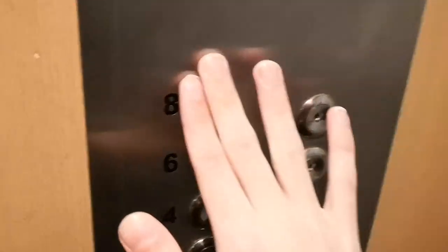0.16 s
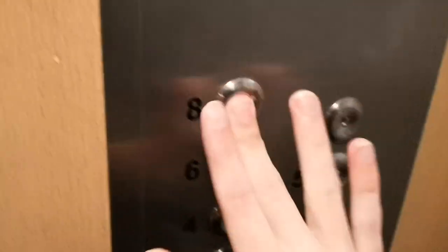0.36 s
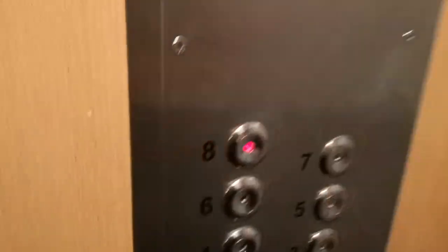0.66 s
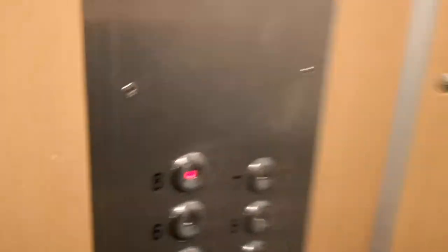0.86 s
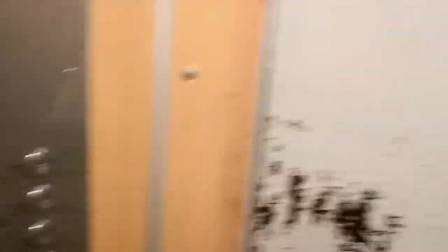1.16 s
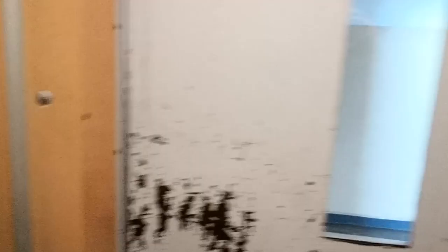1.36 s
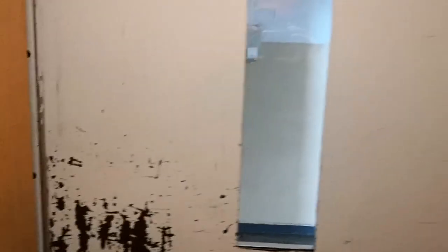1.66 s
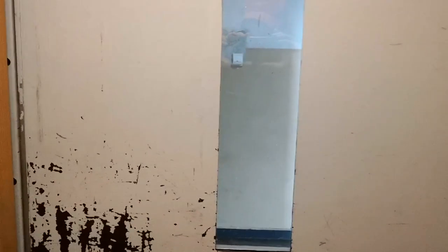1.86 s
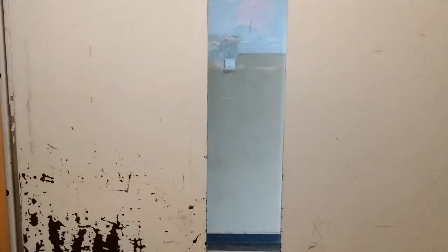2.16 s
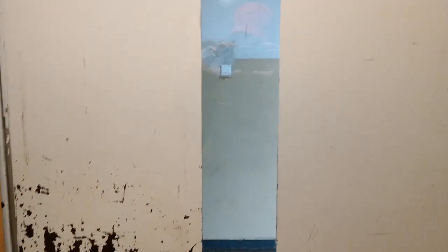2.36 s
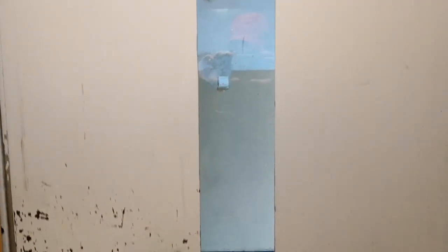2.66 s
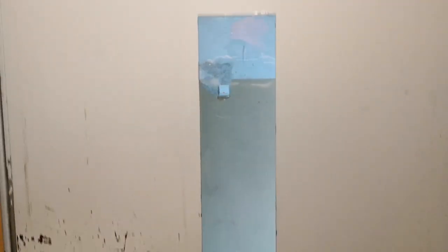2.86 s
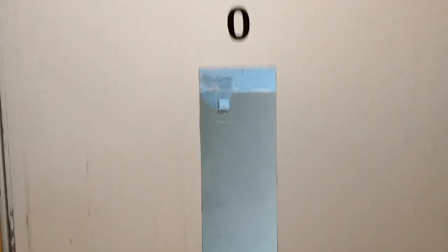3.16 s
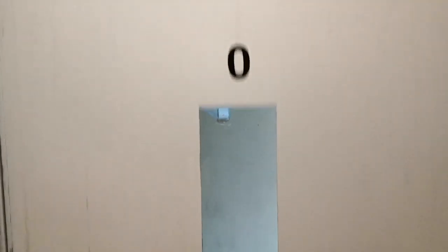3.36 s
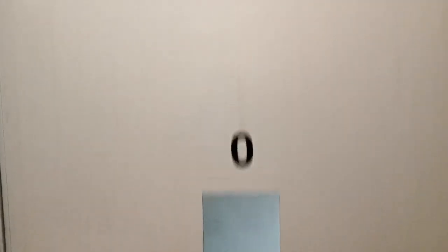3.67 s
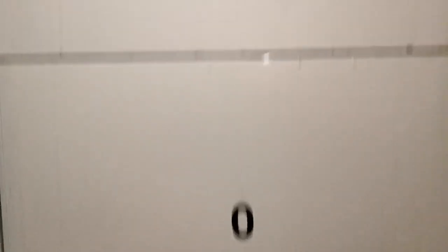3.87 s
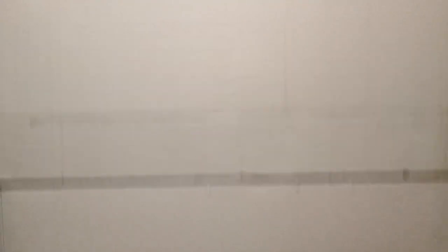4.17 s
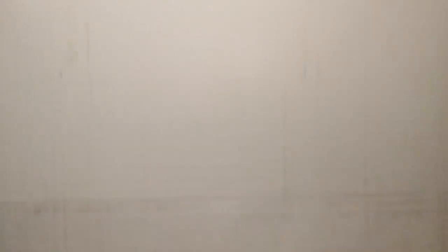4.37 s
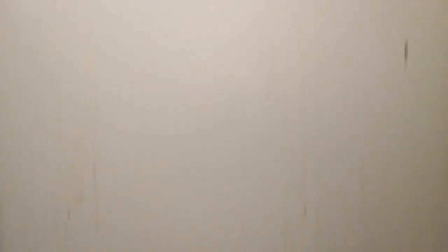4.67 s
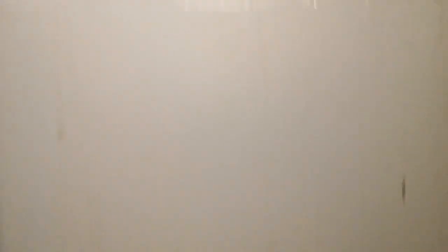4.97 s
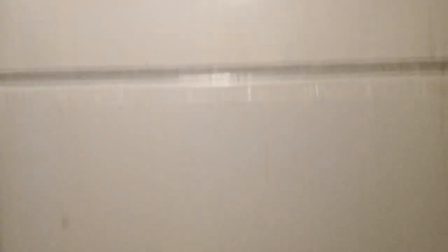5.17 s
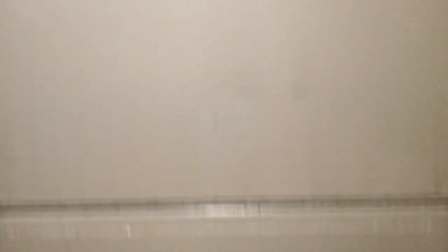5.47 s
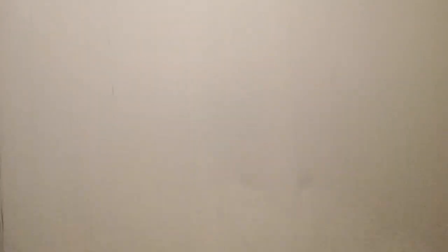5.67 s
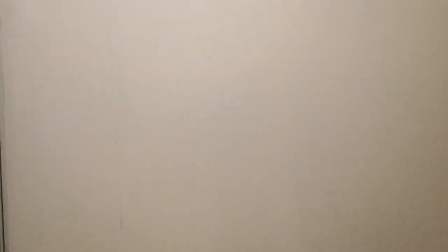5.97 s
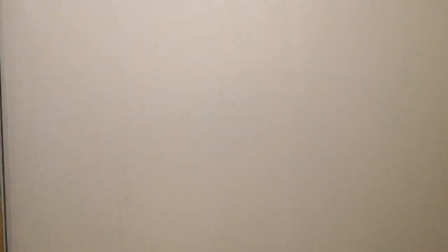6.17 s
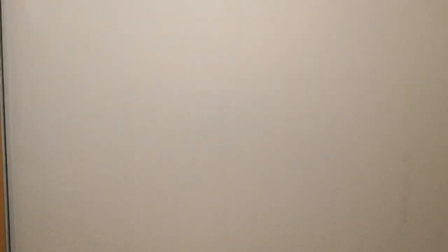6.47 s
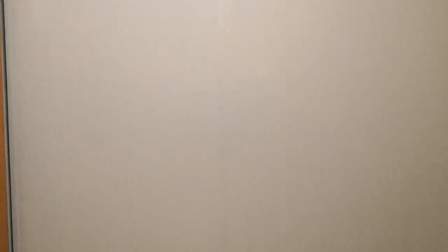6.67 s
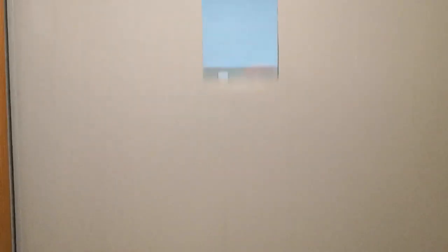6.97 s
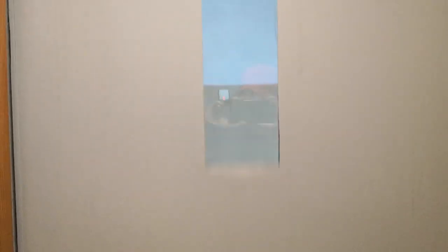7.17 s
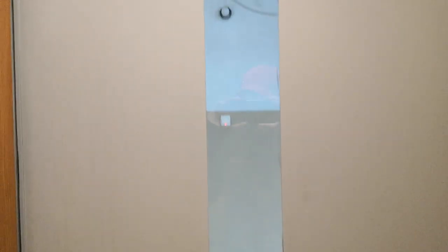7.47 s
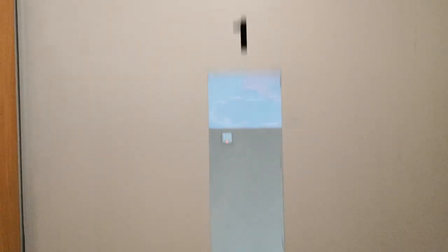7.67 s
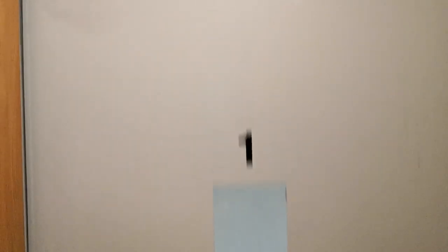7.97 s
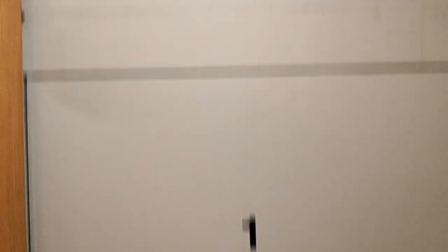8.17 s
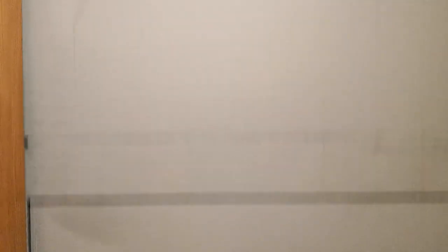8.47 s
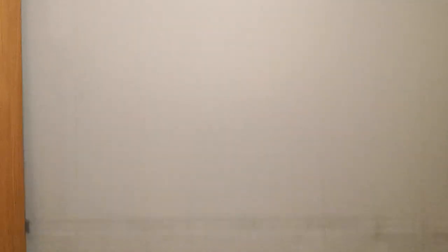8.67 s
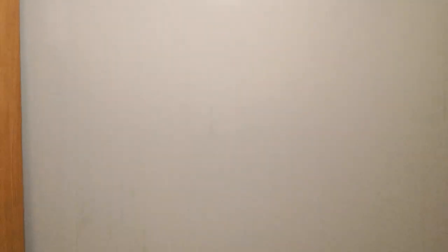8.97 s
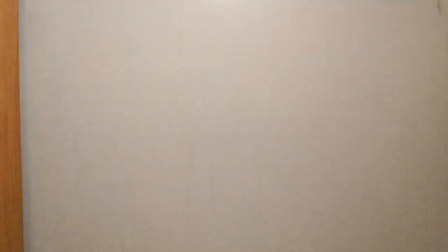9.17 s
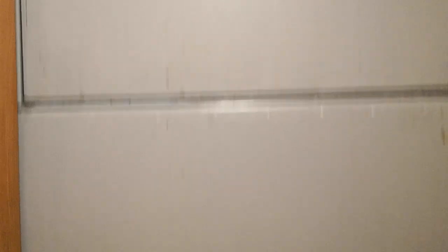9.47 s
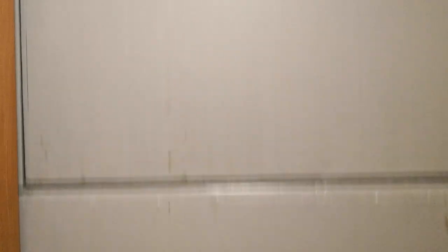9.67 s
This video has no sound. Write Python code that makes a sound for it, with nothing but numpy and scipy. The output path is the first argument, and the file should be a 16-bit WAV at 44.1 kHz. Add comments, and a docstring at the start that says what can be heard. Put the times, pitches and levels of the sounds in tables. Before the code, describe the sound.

Inside a small hard-walled lift car, heard close in stereo. At 0 s a button press gives a clack and a deep thud with low rumble; more clacks follow at 0.4-0.6 s. At about 1 s a hard, loud clunk lands with a short harsh scrape and a floor jolt as the car starts. From 1.5 to 4 s it is quiet: soft low rumble, hum near 90 Hz, faint hiss, tiny ticks clustered at 3.1-3.8 s. From 4 to 4.9 s the guides rub in gritty gusts with dry knocks. Ticks, then a doubled woody knock at 5.5 s, lurches, and a loose panel rattle with scrapes at 5.9-6.1 s. Then calm humming, small ticks and a barely audible thin whine until 8.7 s. From 8.75 s, bright hard raps hit a panel: three quick, then roughly every 0.2 s to the end at 9.8 s, briefly echoing, the last two close together.

```python
"""A button press and a thud open the scene: a small doorless lift car starts and climbs past the landings.
Shaped noise gives its rumble, hum, floor thuds, air booms, hissing and scraping guides, and faint whines.
Larger parts knock and small parts tick as short noise bursts; a panel rattles and is rapped as decaying modes.
Two spaced microphones hear alike in the bass and unalike in the treble of the hard-walled car."""
import sys
import numpy as np
from scipy import signal
from scipy.fft import rfft, irfft, next_fast_len
from scipy.io import wavfile
from scipy.ndimage import uniform_filter1d

SR = 44100
rng = np.random.default_rng(int(sys.argv[2]) if len(sys.argv) > 2 else 0)


def unload_wav(signal):
    """Save mono or channel-first audio to the path in sys.argv[1] as 16-bit WAV at rate SR, clipped to [-1, 1]."""
    wavfile.write(
        sys.argv[1],
        SR,
        np.round(np.clip(np.atleast_2d(signal).T, -1, 1) * 32767).astype(np.int16),
    )


N = 432621  # length in samples
STRIKE_S = np.arange(SR // 2) / SR  # time axis of one knock, tick or rap


def gain_of(db):
    """Decibel law: 20 dB is a factor of ten in amplitude."""
    return 10 ** (np.asarray(db) / 20)


def evened(x):
    """Normalization to unit root-mean-square amplitude."""
    return x / np.sqrt(np.mean(x ** 2) + 1e-20)


def read(points, hz):
    """Interpolation of a spectrum along a logarithmic frequency axis."""
    point_hz, value = np.transpose(points)
    return np.interp(np.log(hz + 1), np.log(point_hz + 1), value)


def curves(rows):
    """Linear interpolation in time of every column after the first."""
    time_s, *columns = np.transpose(rows)
    return [np.interp(np.arange(N) / SR, time_s, column) for column in columns]


def add(mix, start_s, sound):
    """Superposition: a sound is summed into the mix, cut where the mix ends."""
    part = mix[:, round(start_s * SR):][:, :sound.shape[1]]
    part += sound[:, :part.shape[1]]


def peak(hz, centre_hz, width_hz):
    """Resonance: the gain is 1 at the centre and 3 dB down at the edges of the width."""
    return 1 / np.sqrt(1 + (2 * (hz - centre_hz) / width_hz) ** 2)


def modes(hz, table):
    """Modal superposition: the powers of a set of steep resonances add."""
    power = sum((gain_of(db) * peak(hz, mode_hz, width_hz) ** 2) ** 2 for mode_hz, width_hz, db in table)
    return np.sqrt(power)


def slope(hz, edge_hz, order=3):
    """High-pass transition: the gain rises through one half at the edge."""
    return hz ** order / (hz ** order + edge_hz ** order)


# Likeness of the two microphones: frequency_hz, correlation (1 alike, 0 unrelated, -1 opposed)
LIKENESS = [(30, 1), (60, 1), (170, 0.96), (345, 0.58), (520, -0.25), (690, -0.24), (1200, 0.11),
            (1700, -0.1), (2400, -0.11), (3400, 0.15), (4300, -0.15), (8000, .1)]


def likeness(hz):
    """Spatial coherence: the correlation of spaced microphones depends on frequency."""
    return np.clip(read(LIKENESS, hz), -1, 1)


def diffuse(size, colour):
    """Diffuse field: noise from all around, partly shared by two microphones; colour(hz) is its gain."""
    hz = np.fft.rfftfreq(size, 1 / SR)
    left, other = rfft(rng.standard_normal((2, size)))
    same = likeness(hz)
    right = same * left + np.sqrt(1 - same ** 2) * other
    return evened(irfft(np.array([left, right]) * colour(hz), size))


def steadied(x, share):
    """Envelope compression: takes a share of the random throb out of narrow noise."""
    power = uniform_filter1d((x ** 2).mean(0), 1800)  # window in samples
    throb = np.sqrt(abs(power) + .02)
    return evened(x / throb ** share)


def wander(seconds):
    """Low-pass random process: white noise averaged twice over the given time."""
    window = round(seconds * SR)
    once = uniform_filter1d(rng.standard_normal(N), window)
    return evened(uniform_filter1d(once, window))


def humps(events, rise_db_per_s, fall_db_per_s):
    """Exponential growth and decay: the power over time of events around their peaks."""
    lead = SR // 4  # room for growth before the scene begins
    t = np.arange(-lead, SR // 2)[None] / SR
    power = np.zeros((1, N + lead))
    shape = gain_of(np.where(t < 0, rise_db_per_s * t, -fall_db_per_s * t)) ** 2
    for peak_s, db in events:
        add(power, peak_s, gain_of(db) ** 2 * shape)
    return power[0, lead:]


def swelling(steady_db, burst_power, colour):
    """Power addition: coloured noise follows a running level plus bursts."""
    noise = diffuse(next_fast_len(N), colour)[:, :N]
    return np.sqrt(gain_of(steady_db) ** 2 + burst_power) * steadied(noise, 0.44)


# Spectrum of the sway: frequency_hz, relative_db_per_hz
SWAY_SPECTRUM = [(15, -4.5), (28, 5.5), (48, -1.5), (70, -10.5), (110, -34.5), (300, -70), (3000, -200)]
# Running level of the car: time_s, rumble_db, hum_db
RUNNING_LEVELS = [(0.0, -46.5, -44.5), (1.6, -50, -57), (2.0, -63.5, -67.5), (2.2, -48.5, -50),
                  (2.36, -55, -60), (2.55, -59.5, -65), (2.7, -62.5, -56.5), (3.2, -60, -55.5),
                  (3.8, -52, -56.5), (4.3, -51, -56), (5.3, -48.5, -50), (6.5, -45, -53),
                  (6.95, -55, -51.5), (7.5, -50, -49), (8.4, -48.5, -51), (9.81, -54.5, -54)]
# Lurches of the car on its ropes: peak_s, level_db
LURCHES = [(0.0, -19), (.09, -24), (.19, -25), (.29, -29), (.38, -32.5), (.6, -39), (.93, -35.5),
           (1.03, -26), (1.15, -23.5), (1.23, -31.5), (1.48, -36), (2.16, -41.5), (2.26, -39.5),
           (4.37, -31.5), (4.5, -36.5), (4.64, -32.5), (4.86, -37), (5.16, -37), (5.6, -33), (5.79, -31),
           (5.96, -35), (6.25, -41.5), (8.99, -42), (9.26, -43), (9.5, -41), (9.7, -43)]


def sway():
    """Low-frequency vibration: the car sways and lurches on its ropes as a rumble."""
    rumble_db = curves(RUNNING_LEVELS)[0]
    lurches = humps(LURCHES, rise_db_per_s=170, fall_db_per_s=130)
    return swelling(rumble_db, lurches, lambda hz: gain_of(read(SWAY_SPECTRUM, hz)))


# Swells of the hum: peak_s, level_db
HUM_SWELLS = [(.16, -30), (.6, -41), (.72, -40), (.93, -31.5), (1.03, -33), (1.15, -34.5), (1.55, -41),
              (2.75, -50.5), (3.05, -50), (3.32, -38), (3.93, -43.5), (4.26, -38), (4.48, -43.5),
              (4.7, -44), (5.04, -41.5), (5.5, -43), (5.62, -40), (5.85, -35.5), (6.14, -40.5), (6.31, -46),
              (6.47, -40.5), (7.45, -46), (7.78, -45), (8.61, -38.5), (8.77, -41), (9.07, -46), (9.4, -42),
              (9.7, -43)]


def hum():
    """Single-mode resonance: noise in one narrow band is heard as a swelling hum."""
    hum_db = curves(RUNNING_LEVELS)[1]
    swells = humps(HUM_SWELLS, rise_db_per_s=130, fall_db_per_s=160)
    return swelling(hum_db, swells, lambda hz: peak(hz, 92, 15) ** 2)


# Modes of the floor: frequency_hz, half_gain_width_hz, relative_db
FLOOR_MODES = [(145.3, 22, 2.5), (181.6, 41, -7), (221.8, 9.8, -7)]
# Thuds of the floor and the booms they raise in the air: peak_s, thud_db, boom_db
THUDS = [(0.0, -19.5, -44), (.07, -24, -31.5), (0.151, -28.5, -35), (.25, -40.5, -44.5), (.35, -34.5, -51),
         (.6, -35.5, -46), (.66, -49, -45.5), (1.011, -28, -26), (1.08, -30.5, -33), (1.15, -33, -37),
         (1.23, -47, -47), (1.5, -48, -59), (1.55, -53.5, -63), (5.051, -53.5, -68), (5.46, -49.5, -64),
         (5.55, -57, -40.5), (5.6, -47, -46), (5.79, -48, -36), (5.98, -60, -41), (5.85, -58, -42.5),
         (6.3, -58, -52)]


def floor():
    """Structural modes: the floor thuds, and between thuds its level follows the rubbing."""
    rush_db = curves(RUBBING)[0]
    floor_db = -62.5 + 0.51 * (rush_db + 60)
    thuds = humps([(peak_s, db) for peak_s, db, _ in THUDS], rise_db_per_s=170, fall_db_per_s=130)
    return swelling(floor_db, thuds, lambda hz: modes(hz, FLOOR_MODES))


# Modes of the air in the car: frequency_hz, half_gain_width_hz, relative_db
AIR_MODES = [(254.4, 35, 3), (296, 29, -3), (370.2, 66, -6), (484, 26, -8)]
RAP_BOOM_DB, RAP_BOOM_DELAY_S = -27, .056  # air boom after a rap, relative to the rap


def air():
    """Cavity modes: the enclosed air booms with thuds and after raps, and follows the rubbing."""
    rush_db = curves(RUBBING)[0]
    air_db = -63.5 + 0.82 * (rush_db + 60)
    booms = [(peak_s, boom_db) for peak_s, _, boom_db in THUDS]
    booms += [(time_s + RAP_BOOM_DELAY_S, db + RAP_BOOM_DB) for time_s, db, _ in RAPS]
    boom_power = humps(booms, rise_db_per_s=330, fall_db_per_s=250)
    return swelling(air_db, boom_power, lambda hz: modes(hz, AIR_MODES))


# Spectrum of rubbing: frequency_hz, relative_db_per_hz
RUBBING_SPECTRUM = [(200, -29.5), (400, -9.5), (620, -6.5), (1070, -7.5), (1870, -2), (2570, -8),
                    (3200, -13.5), (4120, -18.5), (5100, -20.5), (6000, -28.5), (7450, -22), (8200, -37.5),
                    (8600, -46), (11500, -40), (15500, -51.5)]


def rubbing(hz, above):
    """Band division: the rush lies under the 3500 Hz split, the fizz above it."""
    share = slope(hz, 3500, order=6)
    return gain_of(read(RUBBING_SPECTRUM, hz)) * (share if above else 1 - share)


# Rubbing along the guides: time_s, rush_db, fizz_db
RUBBING = [(0.0, -41.5, -62), (0.3, -59, -64.5), (0.6, -60, -56.5), (0.72, -70, -64), (0.77, -55, -58.5),
           (0.9, -53.5, -65.5), (1.04, -31, -37), (1.1, -40, -56), (1.23, -50, -68), (1.42, -63, -68),
           (1.75, -74.5, -75.5), (2.59, -78, -83), (3.11, -77, -79), (3.9, -71, -82), (4.04, -51, -72),
           (4.1, -42, -65), (4.18, -43.5, -53.5), (4.23, -38, -57.5), (4.4, -38.5, -51), (4.58, -43, -69),
           (4.7, -38, -42.5), (4.83, -43.5, -60.5), (4.95, -59.5, -77.5), (5.3, -64, -76),
           (5.54, -66.5, -79), (5.68, -49.5, -79), (5.87, -52, -76), (5.93, -35, -62), (6.02, -50, -72),
           (6.08, -38.5, -79), (6.28, -61, -77), (6.78, -65, -79), (8.17, -64.5, -73.5), (8.75, -62.5, -77),
           (8.95, -46.5, -58), (9.2, -56.5, -74.5), (9.81, -49.5, -67)]
# Spectrum of the steady hiss: frequency_hz, relative_db_per_hz
HISS_SPECTRUM = [(100, -26), (200, -20), (260, -15), (500, -22.5), (1200, -24.5), (1860, -18.5),
                 (3000, -23.5), (6200, -38.5), (7340, -34.5), (8200, -35), (15500, -30)]
HISS_DB = -71.5


def guides(grain_db=2.0, stroke_db=1.2):
    """Friction noise: rubbing turns grainy as the shoes catch and slip, over a steady hiss."""
    size = next_fast_len(N)
    rush_db, fizz_db = curves(RUBBING)
    force = np.clip((rush_db + 56) / 25, .3, 1)  # hard rubbing is rougher
    roughness_db = force * (grain_db * wander(0.0035) + stroke_db * wander(0.019))
    rush = gain_of(rush_db) * diffuse(size, lambda hz: rubbing(hz, False))[:, :N]
    fizz = gain_of(fizz_db) * diffuse(size, lambda hz: rubbing(hz, True))[:, :N]
    hiss = gain_of(HISS_DB) * diffuse(size, lambda hz: gain_of(read(HISS_SPECTRUM, hz)))[:, :N]
    return (rush + fizz) * gain_of(roughness_db) + hiss


def fade(t, rise_s, t60_s):
    """Reverberant decay: a smooth onset, then 60 dB of fall in each t60."""
    return (1 - np.exp(-(t / rise_s) ** 2)) * gain_of(-60 * t / t60_s)


def sides(pan_db):
    """Level difference: half is added on the left and half taken off on the right."""
    return gain_of([[pan_db / 2], [-pan_db / 2]])


def snap(db, fizz_db, boom_db, ring_hz, ring_db, rise_s, t60_s, pan_db):
    """Impact excitation: a thin clack with a short ring, fizz on top and a slower boom, dying in the car."""
    t = STRIKE_S
    # a clack with little fizz stops low; its top rises with the fizz
    top_hz = 2500 + 90 * max(fizz_db - db + 31, 0)
    clack = diffuse(len(t), lambda hz: rubbing(hz, False) * slope(hz, 720) * (1 - slope(hz, top_hz, order=10)))
    ring = diffuse(len(t), lambda hz: peak(hz, ring_hz, 0.2 * ring_hz) ** 2)
    ring = ring * (0.4 + 0.97 * gain_of(-60 * t / 0.11))  # quicker first drop
    fizz = diffuse(len(t), lambda hz: rubbing(hz, True))
    boom = diffuse(len(t), lambda hz: modes(hz, AIR_MODES) + 0.33 * peak(hz, 700, 900) ** 2)
    share = gain_of(ring_db - 1.5)
    body = (clack + share * ring) / np.sqrt(1 + share ** 2)
    bright = gain_of(db) * body + gain_of(fizz_db) * fizz
    slow_boom = gain_of(boom_db) * boom * fade(t, 0.018, 1.1 * t60_s)
    return sides(pan_db) * bright * fade(t, rise_s, t60_s) + slow_boom


# Knocks and clacks of larger parts: time_s, level_db, fizz_db, boom_db, ring_hz,
# ring_setting_db (against the clack, before a 1.5 dB cut), rise_s, t60_s, left_over_right_db
KNOCKS = [(0.002, -30.5, -38.5, -25.5, 1810, -1, 0.0016, 0.24, -3.5),
          (0.371, -31, -42.5, -38, 1910, 14, 0.0025, 0.19, -3),
          (0.541, -31.5, -38, -32.5, 1230, -4, 0.0015, 0.34, -2),
          (0.566, -22.5, -40, -22, 1840, 13, 0.0017, .14, -5),
          (0.863, -58, -57.5, -55, 2570, 9, 0.0046, 0.58, 4),
          (0.921, -31, -44, -31.5, 1810, -12, 0.0084, 0.25, -1.5),
          (0.986, -13.5, -23.5, -13.5, 1550, -2, 0.002, .16, -0.5),
          (1.441, -48.5, -54, -51.5, 1940, 2, 0.0038, 0.27, -1),
          (1.516, -49, -60, -50, 1924, -4, .0025, 0.17, -2),
          (4.143, -33.5, -58, -50, 1903, 8, 0.0029, 0.99, 0),
          (4.394, -31, -51, -31, 1090, -5, 0.0049, 0.22, 2),
          (4.416, -32.5, -48, -51, 1280, 1, .003, 0.15, 0),
          (4.483, -27.5, -38.5, -32.5, 1850, -17, 0.0022, 0.3, -0.5),
          (4.55, -28, -56, -33.5, 1080, 2, 0.0049, .37, -2),
          (4.6, -33.5, -45.5, -42, 1780, 4, .004, 0.46, -1),
          (4.671, -33, -46, -54, 1320, -2, .0026, 0.14, -5),
          (4.798, -38, -61, -38, 1060, 1, .0035, 0.26, -7),
          (5.383, -54, -65, -63, 1570, -5, 0.0043, 0.49, 0),
          (5.498, -28, -52, -41.5, 1050, 12, .003, 0.36, -1),
          (5.506, -24, -56.5, -35.5, 1060, 11.5, 0.0016, 0.41, -3),
          (5.668, -33.5, -73, -29, 1500, 5, .0025, .15, -1),
          (5.737, -38.5, -80, -34.5, 1800, 3, 0.0033, 0.31, 4),
          (5.803, -36.5, -63, -52, 1700, -2, 0.0068, 0.21, -3),
          (7.415, -54, -71, -55.5, 1540, -6, 0.0029, 0.41, 2)]


def knocks():
    """Impact noise: each larger part is struck with its own ring, onset and decay."""
    out = np.zeros((2, N))
    for time_s, *levels, rise_s, t60_s, pan_db in KNOCKS:
        add(out, max(time_s - 1.1 * rise_s, 0), snap(*levels, rise_s, t60_s, pan_db))
    return out


# Faint ticks of one small part: time_s, level_db, t60_s
TICKS = [(0.357, -47, .15), (2.084, -53.5, .28), (3.122, -47, .3), (3.162, -53, 0.23), (3.357, -55, .27),
         (3.469, -52.5, 0.27), (3.589, -54, 0.32), (3.667, -59, 0.22), (3.698, -50, 0.28),
         (3.768, -55, .29), (4.998, -47.5, .16), (5.192, -49.5, 0.13), (5.238, -56, 0.25), (5.28, -43, 0.2),
         (6.462, -51.5, .11), (6.846, -52, .17), (6.96, -55.5, 0.096), (7.04, -59, 0.11),
         (7.477, -56.5, 0.94), (7.738, -51.5, 0.053), (8.163, -58, .17), (8.43, -57, 0.13),
         (8.533, -52, .18), (8.65, -58, 0.14)]


def ticks():
    """Repeated impact: one small part keeps its ring and onset while level and decay vary."""
    out = np.zeros((2, N))
    rise_s = 0.0013
    for time_s, db, t60_s in TICKS:
        sound = snap(db, db - 24, db - 15.5, ring_hz=1910, ring_db=7.5, rise_s=rise_s, t60_s=t60_s, pan_db=1)
        add(out, time_s - 1.1 * rise_s, sound)
    return out


# Faint whines and swishes: start_s, end_s, centre_hz, half_gain_width_hz, level_db
WHINES = [(0.415, .72, 4930, 500, -82), (0.858, 0.93, 2290, 850, -44.5), (1.08, 1.213, 4960, 540, -58.5),
          (5.493, 5.584, 5350, 600, -60), (6.261, 7.7, 1775, 10, -71.5), (7.388, 7.597, 7440, 650, -74),
          (7.779, 8.016, 1400, 11, -72), (8.204, 8.45, 4900, 400, -79)]


def whines():
    """Band-pass resonance: noise in single resonances fades in and out."""
    out = np.zeros((2, N))
    for start_s, end_s, centre_hz, width_hz, db in WHINES:
        size = round((end_s - start_s) * SR)
        noise = diffuse(size, lambda hz: peak(hz, centre_hz, width_hz) ** 2)
        add(out, start_s, gain_of(db) * steadied(noise, .6) * signal.windows.tukey(size, .5))
    return out


# Modes of the panel: frequency_hz, relative_db, t60_s
PANEL_MODES = [(240, -19, .55), (303, -18, .35), (392, -22, .3), (492, -11, .25), (581, -14, .22),
               (699, -14, .22), (900, -11, .22), (1115, -11, .22), (1330, -9, .16), (1453, -11, .18),
               (1540, -9, .18), (1628, -2, .17), (1720, -4, .16), (1832, -4, .17), (1960, -3, .17),
               (2095, -2, .16), (2153, 0, .15), (2300, -5, .16), (2412, -2, .13), (2500, -2, .14),
               (2587, 0, .15), (2652, -1, .14), (2735, -1, .11), (3340, -14, .18), (3460, -14, .18),
               (3560, -12, .16), (3682, -13, .16)]


def panel_rings():
    """Modal decay: each mode is a dying sine, in another phase at each microphone."""
    hz, db, t60_s = np.transpose(PANEL_MODES)[:, :, None]
    apart = np.arccos(likeness(hz)) * rng.choice([-1, 1], hz.shape)
    start = 2 * np.pi * rng.random(hz.shape)
    decay = gain_of(db - 60 * STRIKE_S / t60_s)
    rings = [decay * np.sin(2 * np.pi * hz * STRIKE_S + start + phase) for phase in (0, apart)]
    return np.array(rings) / np.sqrt(np.sum(gain_of(db) ** 2) / 2)


# Spectrum of a rap's echoes: frequency_hz, relative_db_per_hz
RAP_SPECTRUM = [(150, -42), (250, -40), (450, -17), (1000, -7.5), (1650, -0.5), (2700, -4), (2900, -11),
                (3600, -7.5), (4290, -21.5), (6300, -23.5), (7340, -16.5), (8200, -36), (8600, -38),
                (15500, -44)]
# Decay of the car after a rap, past the first drop: frequency_hz, t60_s
CAR_DECAY = [(250, 0.82), (600, 0.51), (1500, 0.29), (3500, 0.34), (7000, 0.29)]


def echoes():
    """Reverberation: dense echoes die at a speed set by their band, after a quicker first drop."""
    t, out = STRIKE_S, 0
    noise = rfft(diffuse(len(t), lambda hz: gain_of(read(RAP_SPECTRUM, hz))))
    hz = np.fft.rfftfreq(len(t), 1 / SR)
    for k, (_, t60_s) in enumerate(CAR_DECAY):
        # overlapping bands whose gains sum to one
        corners = [(band_hz, float(j == k)) for j, (band_hz, _) in enumerate(CAR_DECAY)]
        out = out + irfft(noise * read(corners, hz), len(t)) * gain_of(-60 * t / t60_s)
    return out * (0.36 + 0.48 * gain_of(-60 * t / 0.22))


# Raps on the panel, first a loose rattle, then clean blows: time_s, level_db, rise_s
RAPS = [(5.883, -24.5, 0.0098), (5.915, -23, 0.0027), (5.935, -23, 0.004), (6.022, -20.5, 0.0013),
        (6.042, -19.5, 0.0013), (6.105, -19, 0.0044), (8.755, -15, 0.002), (8.83, -13, 0.0018),
        (8.943, -12.5, 0.0025), (9.139, -13.5, 0.0011), (9.349, -10.5, 0.0023), (9.554, -11.5, 0.0019),
        (9.747, -11.5, 0.0016), (9.802, -10.5, 0.0047)]


def raps():
    """Struck-plate radiation: panel modes and echoes sound together at each rap."""
    out = np.zeros((2, N))
    rings, steady = panel_rings(), echoes()
    t = STRIKE_S
    above = slope(np.fft.rfftfreq(len(t), 1 / SR), 4500, order=6)
    for time_s, db, rise_s in RAPS:
        # nearly the same spot is struck: the modes change a little in strength and many echoes repeat
        ring = gain_of(2.5 * rng.standard_normal(len(PANEL_MODES))) @ rings
        sound = gain_of(-4.5) * ring + gain_of(-8.0) * steady + gain_of(-9.0) * echoes()
        # only a rap under -24 dB loses treble, 0.6 dB for each dB below
        treble_gain = 1 - above * (1 - gain_of(0.6 * min(db + 24.0, 0)))
        sound = irfft(rfft(sound) * treble_gain, len(t))
        onset = 1 - np.exp(-(t / rise_s) ** 2)
        add(out, time_s - .002, gain_of(db) * sides(-1.2) * sound * onset)
    return out


def scene():
    """Linear superposition of all the sources in the car."""
    car = sway() + hum() + floor() + air()
    return car + guides() + knocks() + ticks() + whines() + raps()


def record(dry):
    """Linear filtering: a treble step of -9 dB, a faint added hiss, then the band limit."""
    step = signal.firwin(511, 8250, window=("kaiser", 7), fs=SR)[None]
    limit = signal.firwin(1023, 15740, window=("kaiser", 9), fs=SR)[None]
    under = signal.oaconvolve(dry, step, "same")
    hiss = gain_of(-80.0) * rng.standard_normal(dry.shape)
    stepped = under + gain_of(-9.0) * (dry - under) + hiss
    return signal.oaconvolve(stepped, limit, "same")


dry = scene()
out = record(dry)
unload_wav(out)
```